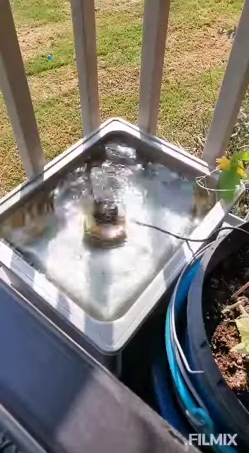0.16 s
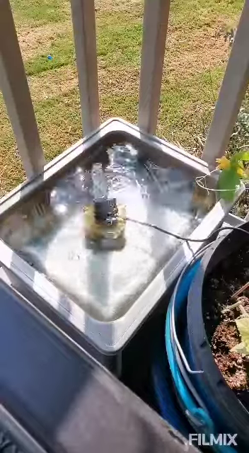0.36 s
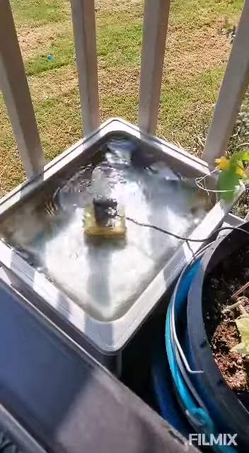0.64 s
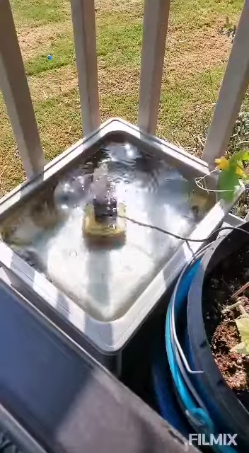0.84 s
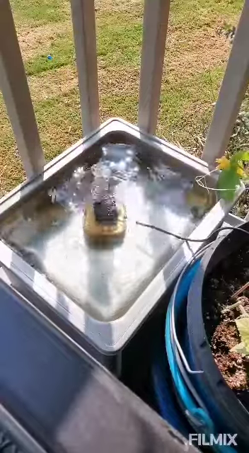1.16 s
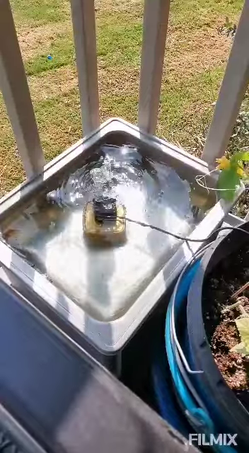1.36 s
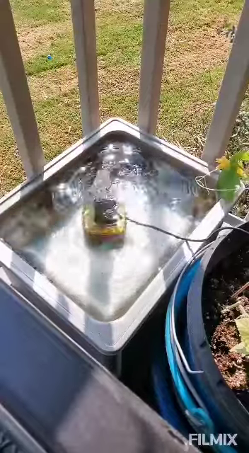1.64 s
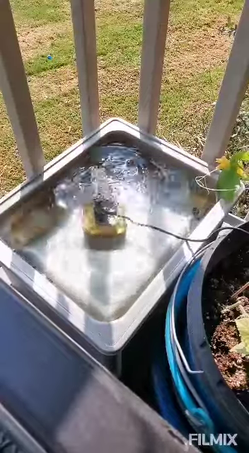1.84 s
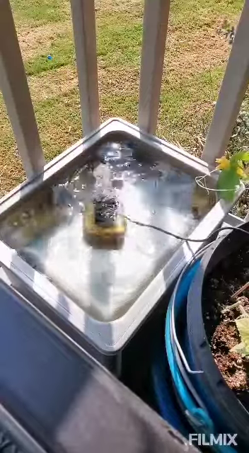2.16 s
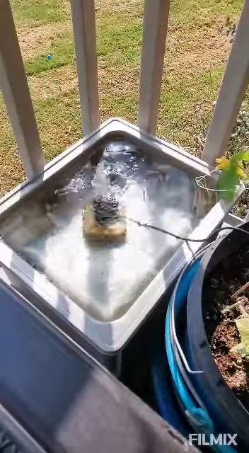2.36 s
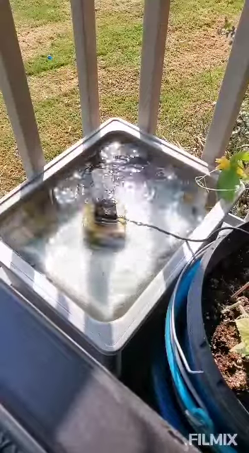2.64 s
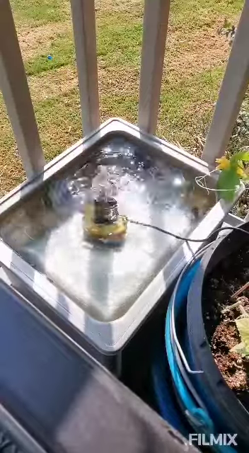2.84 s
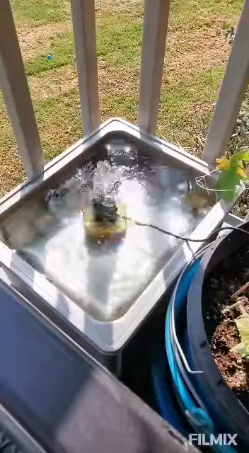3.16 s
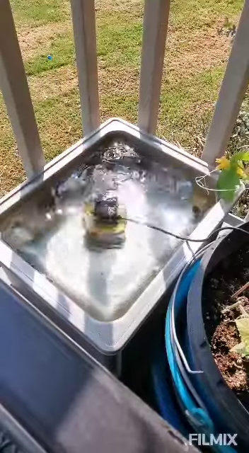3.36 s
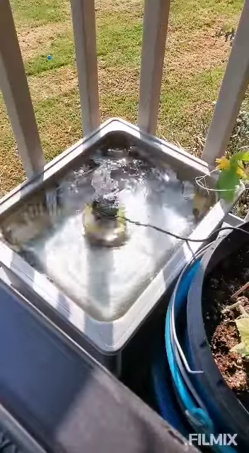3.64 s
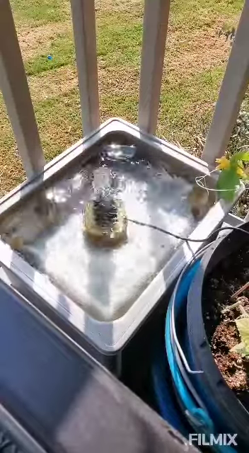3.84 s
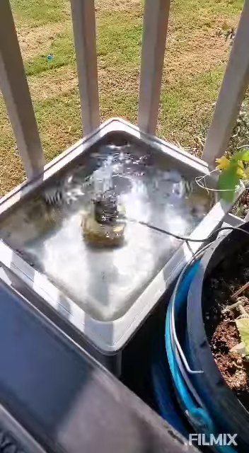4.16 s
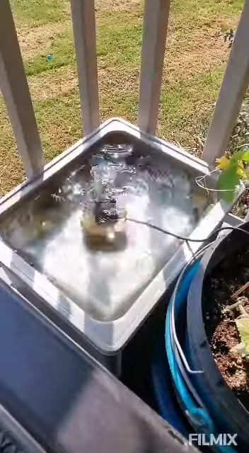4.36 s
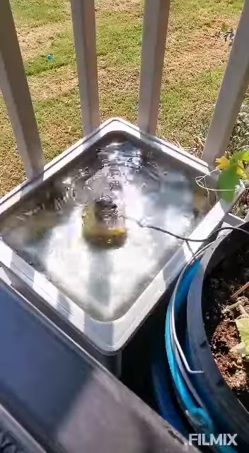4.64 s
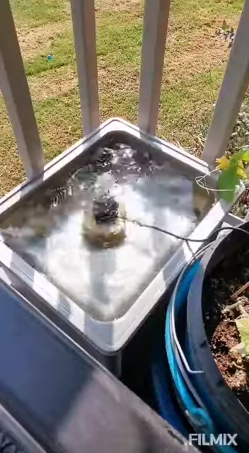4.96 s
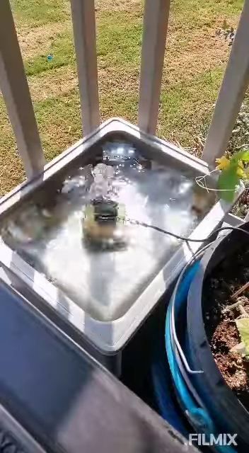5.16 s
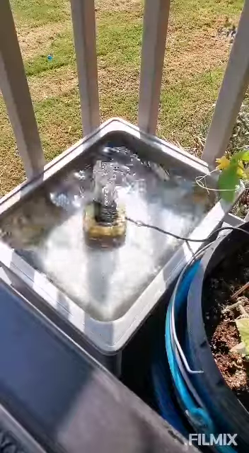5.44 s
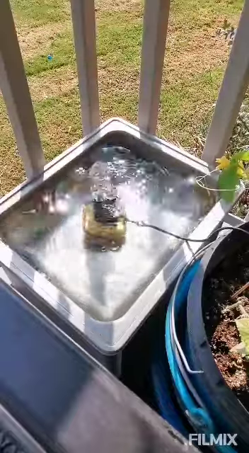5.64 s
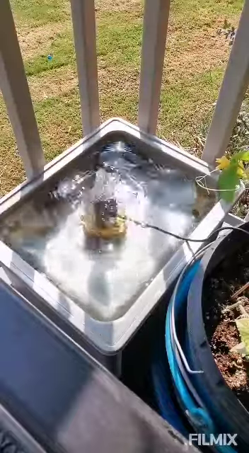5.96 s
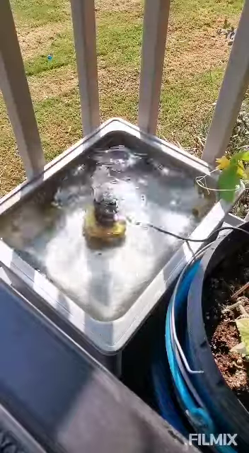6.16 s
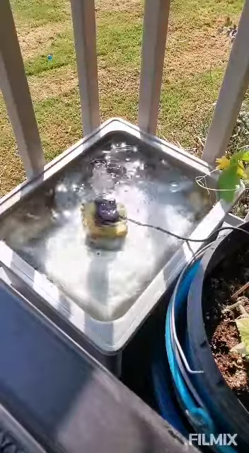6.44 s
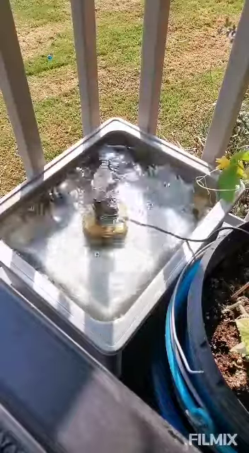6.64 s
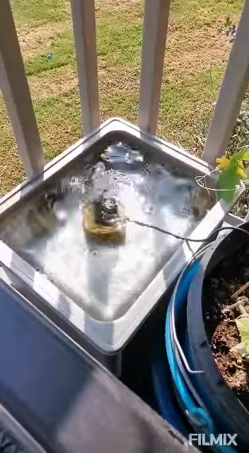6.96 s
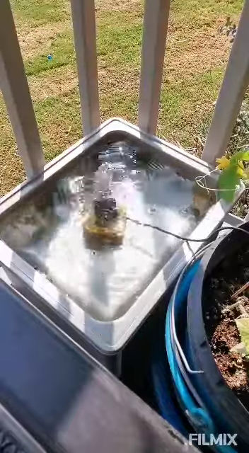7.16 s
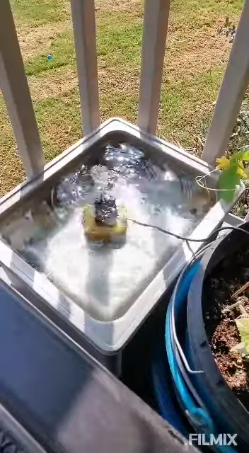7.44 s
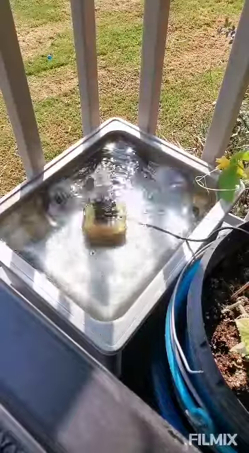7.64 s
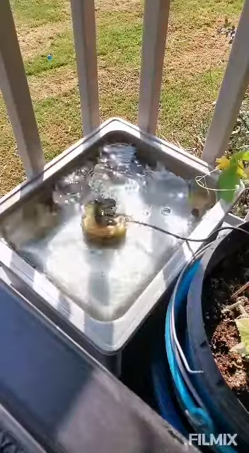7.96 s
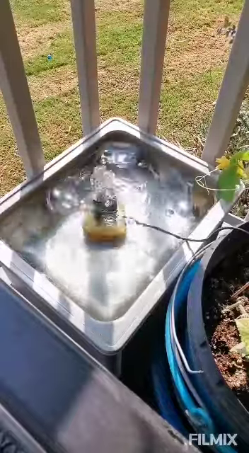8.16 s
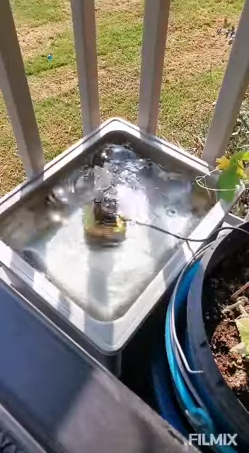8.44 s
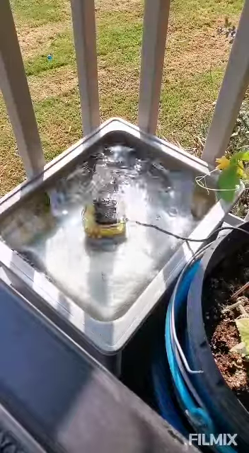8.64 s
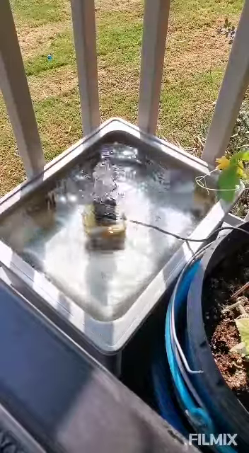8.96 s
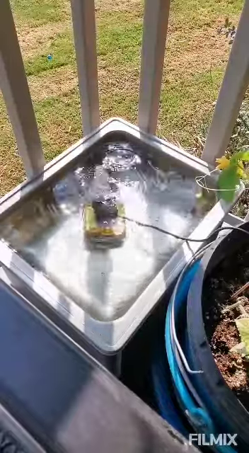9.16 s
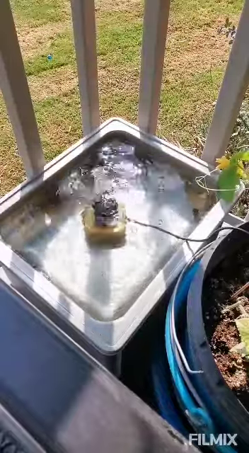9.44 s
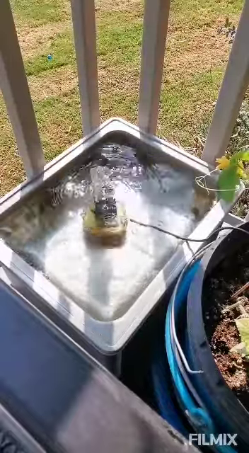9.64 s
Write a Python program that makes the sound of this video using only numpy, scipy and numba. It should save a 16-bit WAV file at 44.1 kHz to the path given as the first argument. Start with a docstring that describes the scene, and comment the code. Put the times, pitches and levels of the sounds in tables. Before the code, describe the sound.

A small water jet patters and plinks into a shallow tub outdoors while close wind gusts rumble and thump, strongest in the first three seconds.

```python
"""A plop and a light patter of water open over a low breeze; soon gusts rumble and thump close by.
A small pump throws a wobbling jet that falls back into a shallow tub on a porch. Trapped bubbles
plink, plop and gurgle as damped rings, slaps and fine spray are shaped noise and short clicks.
Wind is low-passed noise, separate for each of the two ports of a hand-held microphone."""
import sys
import numpy as np
from scipy import signal
from scipy.fft import rfft, irfft
from scipy.io import wavfile
from numba import njit

SR = 44100
rng = np.random.default_rng(int(sys.argv[2]) if len(sys.argv) > 2 else 0)


def store_pcm(level_fs):
    """Save levels as 16-bit WAV."""
    pcm = np.round(np.clip(level_fs, -1, 1) * 32767).astype(np.int16)
    wavfile.write(sys.argv[1], SR, np.atleast_2d(pcm).T)


N = 432180
TIME = np.arange(N) / SR
SPOTS = 6   # landing spots in the tub, each with its own echoes


def from_db(db):
    """Decibels to gain."""
    return 10 ** (np.asarray(db) / 20)


def rms_one(x):
    """Scale to unit power."""
    return x / np.sqrt(np.mean(x ** 2) + 1e-20)


def in_time(rows):
    """Draw straight lines through each column of a curve, at every sample."""
    s, *columns = np.transpose(rows)
    return [np.interp(TIME, s, column) for column in columns]


def at_hz(points, hz):
    """Read a spectrum on a log-frequency axis."""
    f, value = np.transpose(points)
    return np.interp(np.log(np.maximum(hz, 1)), np.log(f), value)


def add(track, s, sound):
    """Mix a sound in at a time in seconds."""
    end = track.shape[-1]
    i = int(np.clip(s * SR, 0, end - 1))
    track[..., i:i + sound.shape[-1]] += sound[..., :end - i]


def drift(rate):
    """Slow chance with spread 1: noise through two equal one-pole low-passes at rate Hz."""
    step = 40   # samples between the slow values
    r = np.exp(-2 * np.pi * rate * step / SR)
    white = rng.standard_normal(N // step + 2002)
    slow = signal.lfilter([1], [1, -2 * r, r * r], white)[2000:]   # skip the settling
    return np.interp(np.arange(N) / step, np.arange(len(slow)), rms_one(slow))


def resonance(x, hz, width_hz):
    """Two-pole band-pass with gain 1 on top."""
    r = np.exp(-np.pi * width_hz / SR)
    zeros = np.array([1, 0, -1]) * (1 - r * r) / 2
    poles = [1, -2 * r * np.cos(2 * np.pi * hz / SR), r * r]
    return signal.lfilter(zeros, poles, x)


def coloured(x, spectrum, size=4096):
    """Causal (minimum-phase) filter that follows a spectrum."""
    hz = np.arange(size // 2 + 1) * SR / size
    cepstrum = irfft(np.log(from_db(at_hz(spectrum, hz))))
    # fold the cepstrum forward in time, so nothing sounds ahead of its cause
    cepstrum[1:size // 2] *= 2
    cepstrum[size // 2 + 1:] = 0
    return signal.oaconvolve(x, irfft(np.exp(rfft(cepstrum))))[:N]


def bubble(hz, t60, rise, snap):
    """A damped ring whose pitch slides by the share rise over t60 seconds; snap 0-1 sharpens its birth."""
    age = np.arange(int(t60 * SR) + 2) / SR
    phase = 2 * np.pi * hz * age * (1 + rise * age / t60 / 2)
    return np.sin(phase + snap * np.pi / 2) * np.exp(-np.log(1000) * age / t60)


def swell(attack_s, length_s, release_s):
    """An envelope that rises, holds until its length is up, then dies away."""
    age = np.arange(SR) / SR
    return np.minimum(age / attack_s, 1) * np.exp(-np.maximum(age - length_s, 0) / release_s)


# Colour of the still outdoor air. Each row: frequency in Hz, relative level in dB.
AIR_COLOUR = [(20, -10), (40, -0.5), (75, -2.5), (100, -25.5), (150, -11), (230, -16.5), (420, -24.5),
              (800, -24.5), (1600, -35), (4000, -47), (9000, -42), (16000, -52.5)]


def still_air(level_db):
    """Quiet outdoor air: steady noise with most of its weight in the bass, independent on each side."""
    return from_db(level_db) * np.array([rms_one(coloured(white, AIR_COLOUR))
                                         for white in rng.standard_normal((2, N))])


@njit
def gliding_lowpass(x, pole):
    """Four one-pole stages with a moving corner."""
    out, state = np.empty(len(x)), np.zeros(4)
    for i in range(len(x)):
        v = x[i]
        for k in range(4):
            v = state[k] = v + pole[i] * (state[k] - v)
        out[i] = v
    return out


def buffeting(level_db, lumpy_db, corner_hz, db_per_octave, squared):
    """Turbulence on one port: faster air is louder and makes smaller, higher eddies."""
    level_db = level_db + lumpy_db * drift(19.7)
    # corner_hz holds at -9.5 dB and moves an octave per db_per_octave
    corner = np.clip(corner_hz * 2 ** ((level_db + 9.5) / db_per_octave), 50, 500)
    pole = np.exp(-2 * np.pi * corner / SR)
    speed = rms_one(gliding_lowpass(rng.standard_normal(N) / np.sqrt(corner), pole))
    speed = 2 * np.tanh(speed / 2)   # no eddy is much faster than the gust that carries it
    # pressure grows with speed squared, so pushes are peaked
    pressure = speed + squared * (speed ** 2 - np.mean(speed ** 2))
    return from_db(level_db) * rms_one(pressure)


def shares(pan_db):
    """Left and right gains whose mean power is 1."""
    gains = from_db(np.array([pan_db, -pan_db]) / 2)
    return gains / np.sqrt(np.mean(gains ** 2, axis=0))


# Light breeze between gusts. Each row: time in seconds, rumble level in dB, left over right in dB.
BREEZE_CURVE = [(0.0, -40.5, 4), (1.0, -34, 2.5), (2.65, -29.5, 0.5), (3.8, -31, 4.5), (4.55, -37.5, 12),
                (5.3, -42.5, 0), (6.1, -31, 1), (6.7, -48, 7), (7.9, -36, 6), (8.7, -43.5, 4.5),
                (9.8, -46, 4.5)]
# Gusts that buffet the ports.
# Each row: start in seconds, length in seconds, rumble level in dB, left over right in dB.
GUST_EVENTS = [(1.079, 0.053, -23.5, 31), (1.237, 0.38, -22, 16.5), (1.797, .13, -19.5, -1.5),
               (1.969, 0.31, -18, 13), (2.404, 0.017, -21, 12), (2.914, 0.028, -21, 25),
               (3.02, 0.16, -22.5, 13), (3.326, 0.19, -32, 3), (3.928, 0.094, -26, 29),
               (4.151, 0.17, -29, 27), (5.507, 0.38, -30, 20), (5.97, 0.302, -29, 10), (6.95, .14, -33, 18),
               (7.25, 0.27, -30, 20), (7.627, 0.16, -27, 26), (8.03, 0.34, -38, 3)]
# Eddies that hit a port squarely.
# Each row: start in seconds, level in dB, left over right in dB, rise constant in seconds.
EDDY_THUMPS = [(1.112, -8.5, 38, 0.00072), (1.907, -6.5, -4, 0.00098), (1.92, 0.5, -36, 0.00085),
               (1.995, -6.5, 13, 0.00057), (2.121, -9.5, 24, 0.00055), (2.223, -4, 24, 0.00052),
               (2.458, -5, 25, 0.00096), (2.937, -4.5, 36, 0.00057), (3.05, -11, 11, 0.001),
               (3.169, -14, 15, 0.00052)]


def wind():
    """Gusts ride on the breeze; each port has its own turbulence; single eddies thump on top."""
    breeze_db, breeze_side_db = in_time(BREEZE_CURVE)
    power = (from_db(breeze_db) * shares(breeze_side_db)) ** 2
    for s, length_s, gust_db, side_db in GUST_EVENTS:
        envelope = swell(attack_s=0.024, length_s=length_s, release_s=0.07)
        add(power, s, (from_db(gust_db) * shares(side_db)[:, None] * envelope) ** 2)
    ports = np.array([buffeting(level_db, lumpy_db=3, corner_hz=197.5, db_per_octave=22.5, squared=0.23)
                      for level_db in 10 * np.log10(power)])
    age = np.arange(SR // 20) / SR
    for s, level_db, side_db, rise in EDDY_THUMPS:
        push = (age / rise) ** 3 * np.exp(-age / rise) / 2   # strongest after three rise constants
        add(ports, s, from_db(level_db) * shares(side_db)[:, None] * push)
    return signal.sosfilt(signal.butter(2, 31, "high", fs=SR, output="sos"), ports)


# Colour of a bursting drop, for spray, slaps and dry ticks. Each row: frequency in Hz, gain in dB.
SPLASH_COLOUR = [(400, -30), (1500, -2.5), (3000, -9.5), (5000, 2.5), (7000, 2.5), (9500, 2), (12500, 1),
                 (15500, -14.5)]


def spray(base_per_s, spread_db, clump_db, cycles, count=18):
    """Fine droplets land in clumps; each ticks for a few cycles in one of several pitch bands."""
    out, together = np.zeros((SPOTS, N)), drift(14)
    for k, hz in enumerate(np.geomspace(3000, 15500, count)):
        crowding = from_db(clump_db * (.7 * together + drift(10)))
        born = rng.random(N) < base_per_s / count * crowding / SR
        size = rng.uniform(-0.9, 1, N)[born]
        clicks = np.zeros(N)
        clicks[born] = from_db(spread_db * np.abs(size) ** 3) * np.sign(size)
        # the tiny offset keeps the filter out of denormal numbers
        out[k % SPOTS] += from_db(at_hz(SPLASH_COLOUR, hz)) * resonance(clicks + 1e-18, hz, hz / cycles)
    return rms_one(out) / np.sqrt(SPOTS)


def ticks(colour, level_db, spread_db, contact_s, count):
    """Stray drops hit the surface with a dry noise tick, one at random in each equal slice of time."""
    out, age = np.zeros((SPOTS, N)), np.arange(SR // 200) / SR
    for k, (when, size) in enumerate(rng.random((count, 2))):
        contact = rng.standard_normal(len(age)) * np.exp(-age / contact_s)
        gain = from_db(level_db - spread_db * np.sqrt(size))   # most are faint
        add(out[k % SPOTS], (k + when) / count * N / SR, gain * contact)
    return np.array([coloured(spot, colour) for spot in out])


# How loud the bubbles of each pitch are, for churn and bubbling. Each row: pitch in Hz, gain in dB.
BUBBLE_LEVELS = [(700, -4), (1100, -3.5), (1600, -5), (2200, 2.5), (2900, -1), (4300, -4.5), (6000, -14)]


def churn(per_s, clump_db, cycles, count=12):
    """Under the jet, clouds of faint bubbles of like size swell and fade."""
    out = np.zeros((SPOTS, N))
    for k, hz in enumerate(np.geomspace(950, 4600, count)):
        born = rng.random(N) < per_s / count / SR
        clicks = born * from_db(clump_db * np.tanh(drift(12.4) / 2))
        gain = from_db(at_hz(BUBBLE_LEVELS, hz)) / np.sqrt(hz)
        out[k % SPOTS] += gain * resonance(clicks + 1e-18, hz, hz / cycles)
    return rms_one(out) / np.sqrt(SPOTS)


def bubbling(spread_db, shortest_cycles, longest_cycles, count=7500):
    """Where the jet lands, drops patter at random: some only tick, others ring on as bubbles."""
    out = np.zeros((SPOTS, N))
    for k, (when, pitch, size, life, climb) in enumerate(rng.random((count, 5))):
        hz = 700 * (6500 / 700) ** (pitch ** .85)
        cycles = shortest_cycles * (longest_cycles / shortest_cycles) ** life
        gain = from_db(at_hz(BUBBLE_LEVELS, hz) + spread_db * size ** 1.63) / cycles ** 0.41
        ring = bubble(hz, cycles / hz, rise=0.15 * climb, snap=0.11)
        add(out[k % SPOTS], when * N / SR, gain * ring)
    return rms_one(out) / np.sqrt(SPOTS)


# Bubbles that keep singing as they slide up in pitch.
# Each row: start in seconds, level in dB, pitch in Hz, length in seconds, pitch rise as a share.
CHIRP_EVENTS = [(7.615, -57, 3560, .13, .07), (7.675, -55, 2140, 0.096, .12)]


def chirps(attack_s, release_s, fade_db, waver_db):
    """A bubble held just under the surface rings on unevenly, fading and climbing in pitch."""
    out, age = np.zeros((SPOTS, N)), np.arange(SR) / SR
    for k, (s, level_db, hz, length, rise) in enumerate(CHIRP_EVENTS):
        along = np.minimum(age / length, 1)
        tone = np.sin(2 * np.pi * np.cumsum(hz * (1 + rise * along)) / SR)
        envelope = from_db(level_db - fade_db * along) * swell(attack_s, length, release_s)
        add(out[k % SPOTS], s, envelope * tone)
    return out * from_db(waver_db * drift(90))


# Runs of small bubbles that drain at the surface. Each row: start in seconds, level in dB, pitch in Hz,
# length in seconds, pitch rise as a share, pitch scatter in octaves.
GURGLE_RUNS = [(0.097, -52, 1620, 0.045, -0.023, 0.28), (0.187, -44.5, 1360, 0.12, -0.15, 0.62),
               (0.216, -46, 3080, .09, 0.16, 1.44), (0.359, -54, 885, 0.064, -0.017, 0.33),
               (0.438, -50, 1365, 0.035, 0.00052, .1), (0.579, -49, 1850, 0.06, 0.46, 1),
               (2.261, -42, 1700, 0.031, -0.28, 0.35), (2.303, -46, 2140, .1, 0.067, 1.46),
               (7.728, -43, 2390, 0.055, 0.17, 0.32), (8.35, -48, 1480, 0.058, 0.19, 0.27)]


def gurgles(cycles, count=13):
    """Bubbles break one after another, their pitch sliding as they shrink or merge."""
    out = np.zeros((SPOTS, N))
    for k, (s, level_db, hz, length, rise, scatter) in enumerate(GURGLE_RUNS):
        for i, (late, size, detune) in enumerate(rng.random((count, 3))):
            along = (i + late) / count
            pitch = hz * (1 + rise * along) * 2 ** (scatter * (detune - .5))
            ring = bubble(pitch, cycles / pitch, rise=0.09, snap=0)
            add(out[k % SPOTS], s + along * length, from_db(level_db - 1.3 * size) * ring)
    return out


# Drops that trap a small bubble. Each row: start in seconds, level in dB, pitch in Hz.
PLINK_DROPS = [(1.289, -33, 4300), (1.366, -34.5, 4500), (1.423, -36.5, 3200), (1.667, -37, 1730),
               (1.908, -39.5, 2270), (2.198, -39.5, 1810), (2.417, -40, 2020), (2.79, -37, 1530),
               (3.245, -36, 1950), (3.319, -33.5, 4830), (3.701, -32, 1670), (3.752, -30.5, 2860),
               (3.839, -36.5, 1660), (3.897, -35, 1610), (3.964, -30, 2240), (4.399, -36.5, 1940),
               (4.173, -33, 4900), (4.289, -37, 4300), (4.457, -34.5, 4340), (4.515, -33.5, 4550),
               (4.742, -36, 4500), (4.887, -38, 2220), (4.91, -35, 2050), (4.972, -32, 1460),
               (5.133, -33, 1700), (5.33, -36, 4900), (5.579, -40.5, 1460), (5.933, -32.5, 1900),
               (6.291, -38, 4400), (6.553, -26.5, 2980), (6.659, -36.5, 3400), (7.025, -37, 2230),
               (7.156, -34.5, 5000), (7.26, -37, 2480), (7.611, -24, 3400), (8.331, -33.5, 1820),
               (8.467, -31.5, 2380), (8.696, -36.5, 4700), (8.829, -36, 1680), (9.138, -32.5, 1850),
               (9.248, -37.5, 1450), (9.327, -40.5, 4330), (9.582, -30, 4400)]


def plinks(cycles):
    """Small bubbles ring for some tens of cycles, most of them climbing in pitch."""
    out = np.zeros((SPOTS, N))
    climbs = rng.standard_normal(len(PLINK_DROPS))
    for k, ((s, level_db, hz), climb) in enumerate(zip(PLINK_DROPS, climbs)):
        ring = bubble(hz, cycles / hz, rise=0.05 + 0.081 * climb, snap=1.0)
        add(out[k % SPOTS], s, from_db(level_db) * ring)
    return out


# Lumps of water that trap a large bubble.
# Each row: start in seconds, level in dB, pitch in Hz, time to fall 60 dB in seconds.
PLOP_DROPS = [(0.004, -40.5, 660, 0.089), (2.791, -27.5, 609, 0.14), (4.399, -37, 750, 0.046),
              (4.522, -35, 780, 0.01), (4.745, -34.5, 776, 0.13), (5.333, -40, 825, 0.04),
              (5.706, -36, 598, 0.052), (6.924, -30, 572, 0.08), (7.442, -34.5, 870, 0.022),
              (7.805, -39, 725, 0.035), (8.061, -32.5, 626, 0.062), (8.129, -37.5, 620, 0.045),
              (8.329, -36.5, 688, 0.073), (8.883, -32, 671, 0.045), (8.967, -30, 665, 0.011),
              (9.009, -41.5, 824, 0.052), (9.251, -34, 715, 0.049), (9.31, -43.5, 630, 0.075)]


def plops(smack_db, smack_t60, froth_db, froth_s, count=7):
    """Large bubbles ring low and long; the closing cavity smacks and sheds a froth of smaller ones."""
    out = np.zeros((SPOTS, N))
    for k, (s, level_db, hz, t60) in enumerate(PLOP_DROPS):
        spot = out[k % SPOTS]
        add(spot, s, from_db(level_db) * bubble(hz, t60, rise=0.0048, snap=1))
        add(spot, s, from_db(level_db + smack_db) * bubble(1.55 * hz, smack_t60, rise=.1, snap=0.09))
        for late, pitch in rng.random((count, 2)):
            small_hz = 2 * hz * 4 ** pitch
            froth = bubble(small_hz, 14 / small_hz, rise=.1, snap=0.067)
            add(spot, s + froth_s * late ** 2, from_db(level_db + froth_db) * froth)
    return out


# Colour of a drop's first contact with the surface. Each row: frequency in Hz, gain in dB.
IMPACT_COLOUR = [(300, -30), (800, 9), (2000, 1), (4500, -9.5), (8000, -9.5), (15500, -15)]


def impacts(plop_db, plink_db, contact_s):
    """Every plop and plink has a noise tick as the drop first touches the surface."""
    out, age = np.zeros((SPOTS, N)), np.arange(SR // 100) / SR
    for drops, tick_db in [(PLOP_DROPS, plop_db), (PLINK_DROPS, plink_db)]:
        for k, (s, level_db, *_) in enumerate(drops):
            contact = rng.standard_normal(len(age)) * np.exp(-age / contact_s)
            add(out[k % SPOTS], s, from_db(level_db + tick_db) * contact)
    return np.array([coloured(spot, IMPACT_COLOUR) for spot in out])


# Drops that slap and burst. Each row: start in seconds, level in dB, brightest frequency in Hz,
# sizzle in dB relative to that level.
SLAP_DROPS = [(0.423, -36.5, 9500, -32), (0.646, -37, 6160, -24), (1.024, -35, 11100, -22),
              (1.05, -29.5, 12700, -25), (1.129, -23.5, 10800, -15.5), (1.423, -29, 9100, -18.5),
              (1.439, -32.5, 10900, -14), (1.462, -30, 9100, -17), (1.503, -25, 10300, -18),
              (1.553, -26, 8850, -22.5), (1.664, -12.5, 9200, -28), (1.67, -21, 10600, -43),
              (2.587, -37, 7500, -12), (2.739, -27.5, 7750, -23), (3.084, -38.5, 6040, -19),
              (3.151, -27, 8450, -28), (3.321, -35.5, 5600, -34), (3.387, -40.5, 6700, -34),
              (3.841, -29, 8800, -25), (3.991, -27, 6000, -29), (4.134, -33, 6300, -18),
              (4.29, -35, 8500, -29), (4.465, -29.5, 9700, -28), (4.666, -28.5, 9000, -41),
              (4.744, -27, 9700, -35), (4.976, -33, 9600, -12.5), (5.082, -29.5, 8000, -29),
              (5.144, -29.5, 9150, -35), (5.176, -37, 7800, -10), (5.191, -36, 9000, -22),
              (5.831, -35.5, 8550, -15.5), (6.293, -37, 5460, -30), (6.366, -21, 8400, -18.5),
              (6.377, -21.5, 8850, -38), (6.389, -18, 11300, -30), (6.554, -37.5, 5800, -19),
              (6.66, -35.5, 10900, -9.5), (6.757, -28, 7900, -19), (6.861, -39, 5600, -20),
              (6.923, -31.5, 6660, -40), (7.071, -36, 11000, -4), (7.151, -25, 6350, -30),
              (7.159, -23.5, 9400, -20), (7.262, -33, 6860, -8), (7.373, -31, 9400, -12),
              (7.443, -29.5, 11300, -18), (8.063, -40, 7900, -39), (8.331, -31.5, 7140, -42),
              (8.581, -30, 7900, -42), (8.805, -40, 8650, -33), (8.881, -39, 7700, -31),
              (9.305, -34.5, 8600, -21), (9.37, -35, 8050, -26)]
# Colour of the sizzling mist after a slap. Each row: frequency in Hz, gain in dB.
SIZZLE_COLOUR = [(1500, -12), (4000, -5.5), (7000, -7), (11000, -2.5), (15500, -8.5)]


def slaps(snap_db, crack_s, burst_s, burst_db, focus_db, sizzle_s):
    """A snap and a burst of torn film, brightest at one pitch; then the thrown mist sizzles down."""
    cracks, mist = np.zeros((2, SPOTS, N))
    age = np.arange(SR // 6) / SR
    for k, (s, level_db, hz, sizzle_db) in enumerate(SLAP_DROPS):
        film, drops = rng.standard_normal((2, len(age)))
        decay = np.exp(-age / crack_s) + from_db(burst_db) * np.exp(-age / burst_s)
        crack = film * (1 - np.exp(-age / crack_s)) * decay
        add(crack, crack_s, from_db(snap_db) * bubble(hz, t60=3 / hz, rise=0, snap=0.93))
        crack = crack + from_db(focus_db) * resonance(crack, hz, width_hz=1550)
        sizzle = drops * np.abs(drops) * np.exp(-age / sizzle_s)   # squaring makes it spiky
        add(cracks[k % SPOTS], s, from_db(level_db) * crack)
        add(mist[k % SPOTS], s, from_db(level_db + sizzle_db) * sizzle)
    return np.array([coloured(crack, SPLASH_COLOUR) + coloured(sizzle, SIZZLE_COLOUR)
                     for crack, sizzle in zip(cracks, mist)])


# Steady patter of the falling jet. Each row: time in seconds, bubbling level in dB, spray level in dB.
JET_CURVE = [(0.0, -72, -62), (0.41, -59.5, -67.5), (1.39, -67, -71.5), (1.58, -67.5, -57),
             (2.05, -60, -67.5), (3.93, -59, -61.5), (4.42, -62, -66.5), (5.1, -57, -63.5),
             (5.43, -62.5, -68), (6.85, -60, -62), (7.31, -61, -59.5), (7.59, -57.5, -65),
             (8.0, -61.5, -57.5), (9.09, -57.5, -70), (9.47, -56.5, -61), (9.8, -60.5, -68)]


def patter(shower_db, lead_s, attack_s, release_s):
    """Bubbling and spray levels in dB; a shower of drops round each plink and gurgle lifts the bubbling."""
    steady_db, spray_db = in_time(JET_CURVE)
    power = from_db(steady_db) ** 2
    shower = from_db(shower_db) * swell(attack_s, attack_s, release_s)
    for s, *_ in [*PLINK_DROPS, *GURGLE_RUNS]:
        add(power, s - lead_s, shower ** 2)
    return 10 * np.log10(power), spray_db


def porch(spots, early_db, early_t60, tail_db, tail_t60, bass_loss):
    """Tub walls and railings scatter each landing spot differently, the treble most."""
    age = np.arange(SR // 4) / SR
    port_lag_s = 6 / SR   # the left port is nearer
    direct = np.sinc((age - [[0], [port_lag_s]]) * SR)
    out = 0
    for spot in spots:
        echoes = 0
        for level_db, t60, start_s in [(early_db, early_t60, .0003), (tail_db, tail_t60, .004)]:
            decay = np.exp(-np.log(1000) * age / t60) * (age > start_s)
            scatter = rng.standard_normal(direct.shape) * decay
            echoes = echoes + from_db(level_db) * rms_one(scatter) / np.sqrt(len(age))
        dull = signal.sosfilt(signal.butter(1, 2500, fs=SR, output="sos"), echoes)
        response = direct + echoes - bass_loss * dull
        out = out + signal.oaconvolve(spot[None], response, axes=1)[:, :N]
    return out


def scene():
    """Water in the tub, wind, and quiet air."""
    bubbling_db, spray_db = patter(shower_db=-64, lead_s=0.03, attack_s=0.04, release_s=0.045)
    surge_db = 2.2 * drift(7.0)   # the jet wobbles, so its water comes down in lumps
    spray_gain, bubbling_gain = from_db(spray_db), from_db(bubbling_db)
    water = from_db(spray_db + surge_db - 3.5) * spray(base_per_s=770, spread_db=36.5, clump_db=3, cycles=6.6)
    water += spray_gain * ticks(SPLASH_COLOUR, level_db=34.5, spread_db=10, contact_s=0.00013, count=150)
    water += bubbling_gain * ticks(IMPACT_COLOUR, level_db=17.5, spread_db=30, contact_s=0.0016, count=110)
    water += from_db(bubbling_db - 12.5) * churn(per_s=3700, clump_db=20, cycles=7.3)
    patter_rings = bubbling(spread_db=30.5, shortest_cycles=6.0, longest_cycles=130)
    water += from_db(bubbling_db + surge_db - 2) * patter_rings
    water += chirps(attack_s=0.012, release_s=0.0092, fade_db=14, waver_db=1)
    water += gurgles(cycles=28) + plinks(cycles=28.6)
    water += plops(smack_db=-8.5, smack_t60=0.019, froth_db=-24.5, froth_s=0.019)
    water += impacts(plop_db=-12.0, plink_db=-7, contact_s=0.0028)
    water += slaps(snap_db=1.5, crack_s=.0007, burst_s=0.001, burst_db=-23.5, focus_db=4.0, sizzle_s=0.026)
    water = porch(water, early_db=5.5, early_t60=0.021, tail_db=0.5, tail_t60=0.13, bass_loss=0.72)
    sides_db = [[-3.3], [-1.3]]   # water level on the left and the right
    return water * from_db(sides_db) + wind() + still_air(level_db=-50)


# Cavity resonances, one list for the left port and one for the right.
# Each row: frequency in Hz, width in Hz, boost (or cut, if negative) in dB.
PORT_MODES = [
    [(900, 130, -2.5), (4460, 340, 9.5), (9150, 880, 4.5)],
    [(2234, 123, 8), (3900, 170, 3.5), (9700, 610, -1.5)],
]


def record(dry):
    """Each port's cavities colour its side; a steep low-pass cuts the top above 16 kHz."""
    sides = []
    for x, modes in zip(dry, PORT_MODES):
        colour = sum((from_db(db) - 1) * resonance(x, hz, width) for hz, width, db in modes)
        sides.append(x + colour)
    return signal.sosfilt(signal.ellip(10, .2, 80, 16000, fs=SR, output="sos"), sides)


dry = scene()
out = record(dry)
store_pcm(out)
```